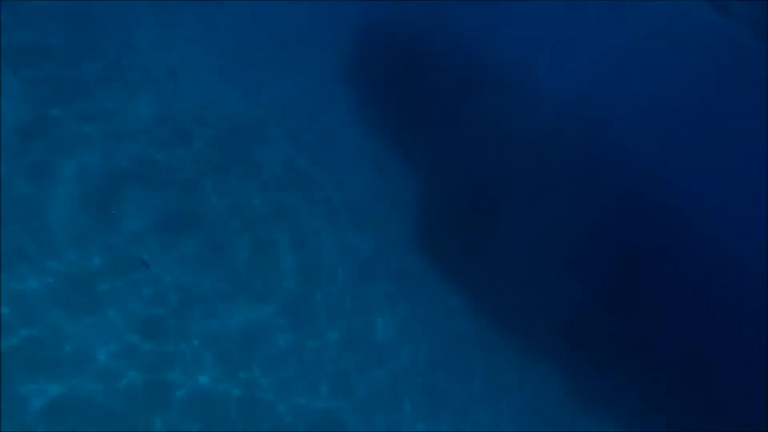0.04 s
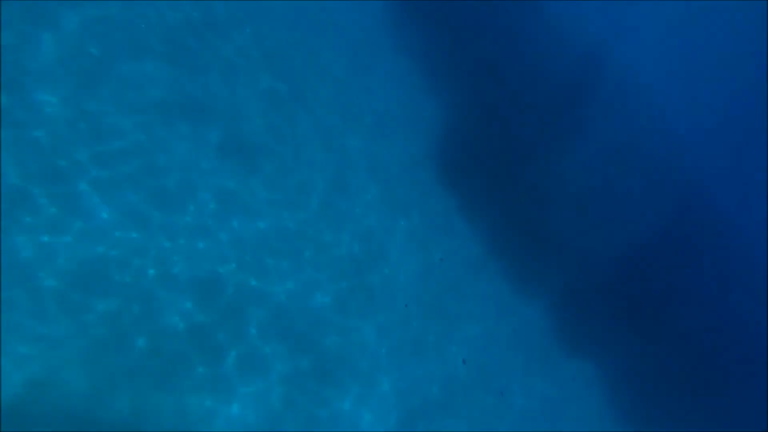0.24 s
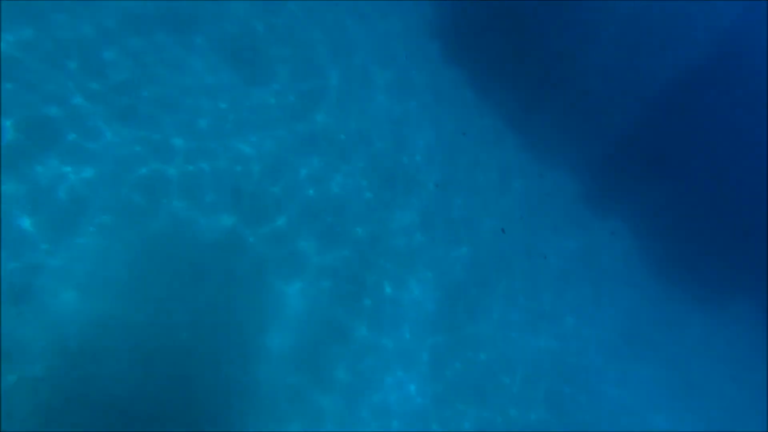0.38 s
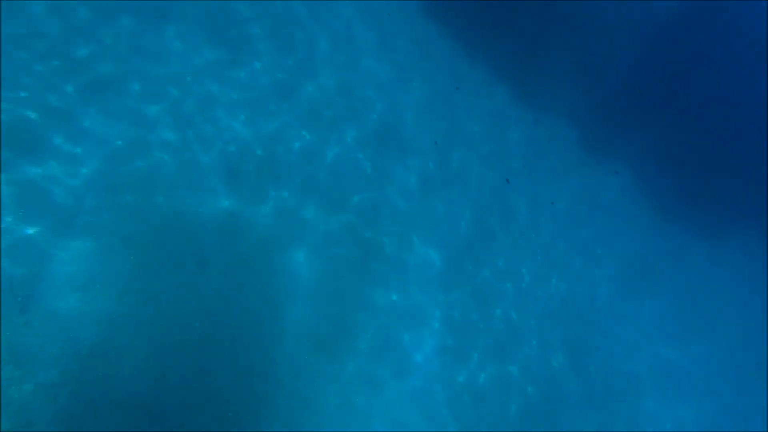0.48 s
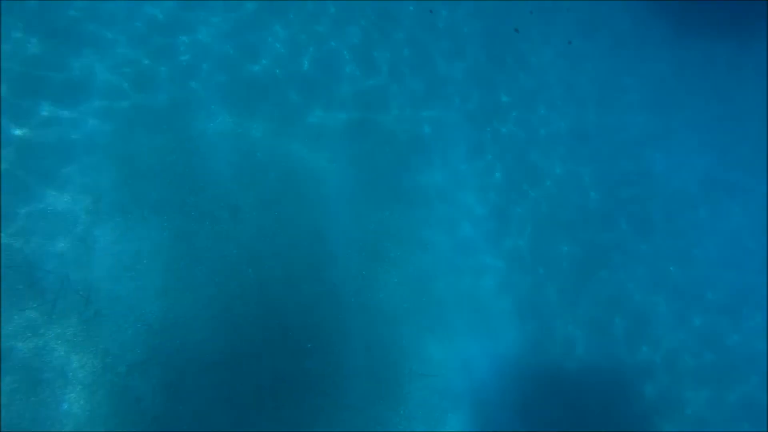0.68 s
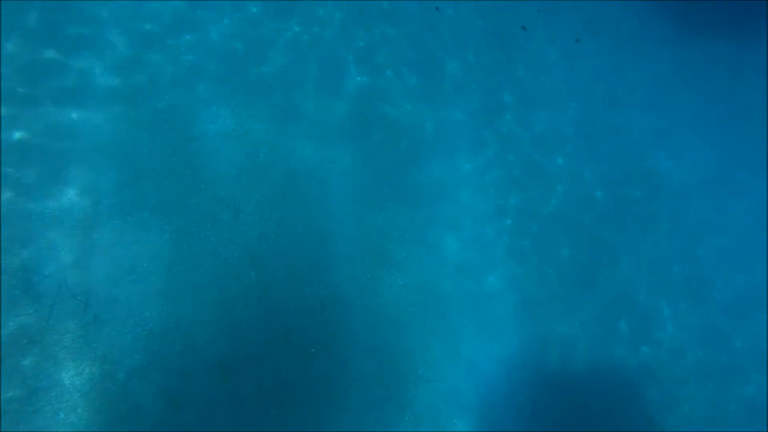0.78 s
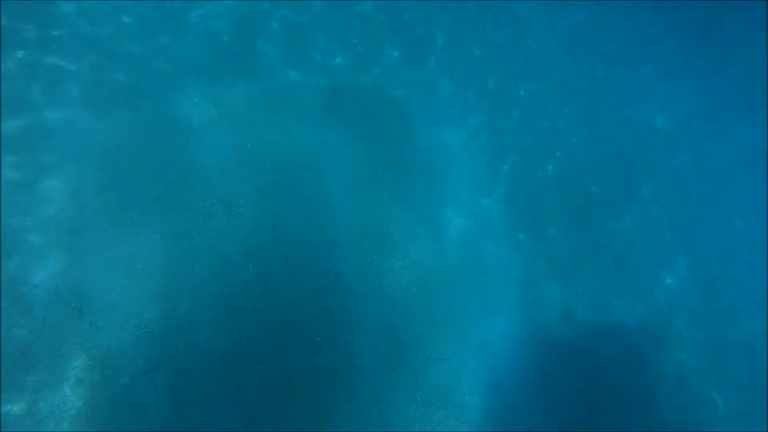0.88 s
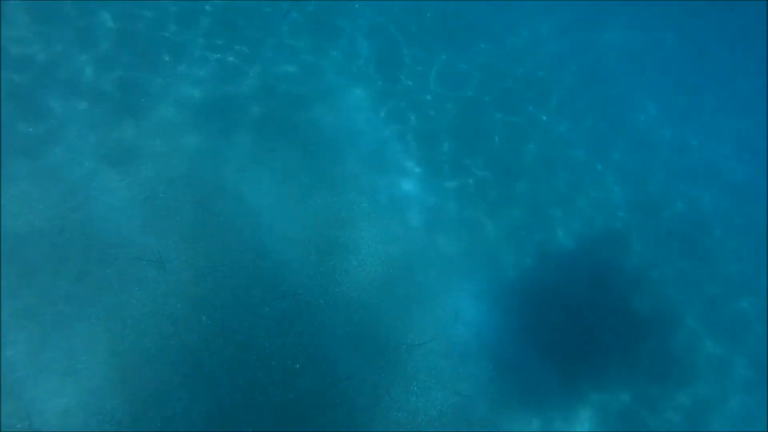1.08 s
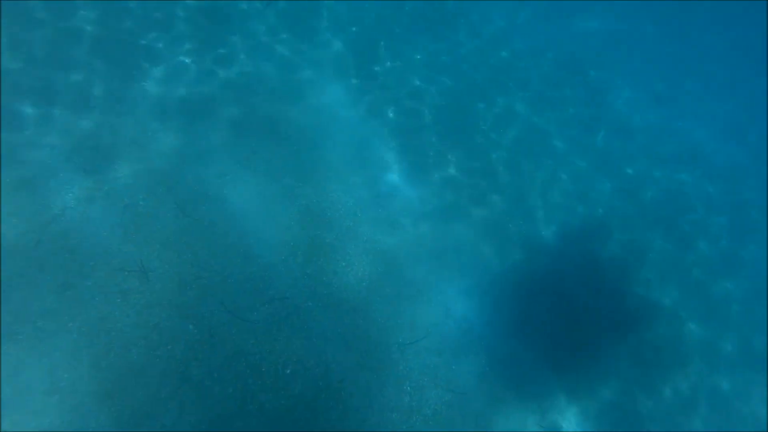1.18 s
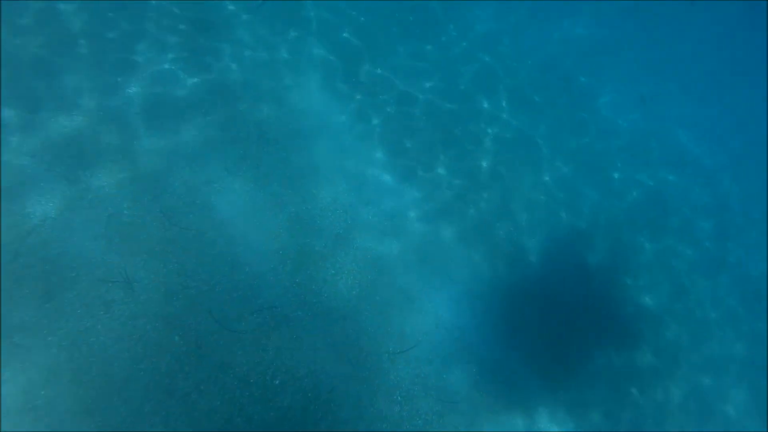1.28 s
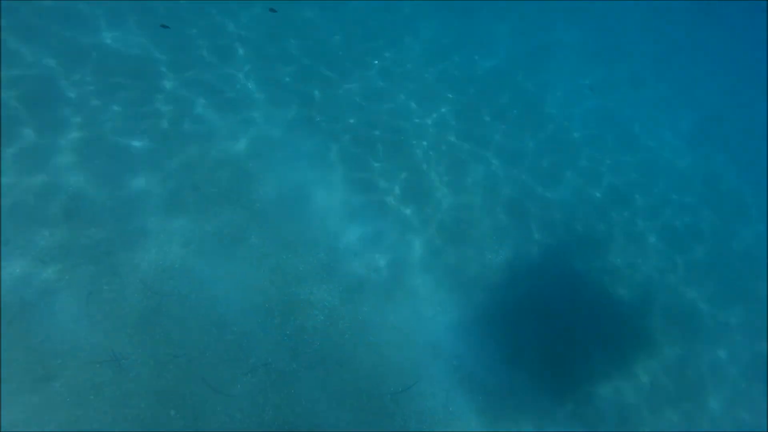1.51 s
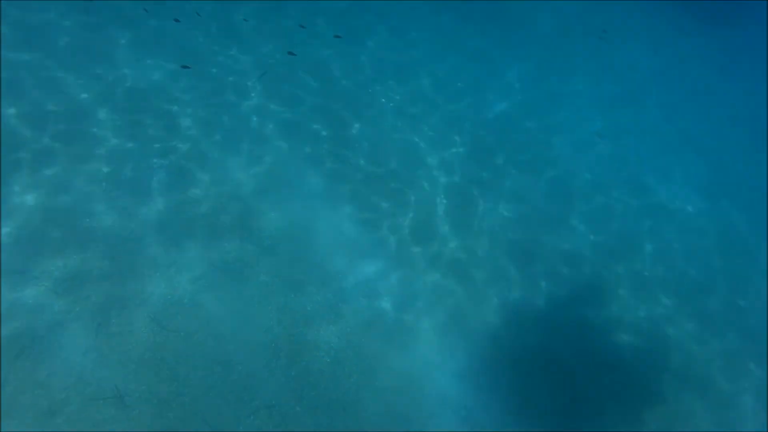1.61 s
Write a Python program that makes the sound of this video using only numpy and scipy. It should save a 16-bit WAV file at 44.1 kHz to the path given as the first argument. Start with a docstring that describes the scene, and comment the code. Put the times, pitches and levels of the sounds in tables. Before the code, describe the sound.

A splash hits a waterproof camera dipped into the sea: water slaps the case, spray hisses and pops, and surges close over the microphones. Underwater, muffled gurgles and glugs thin out to a dull hum.

```python
"""A camera in a waterproof housing is dipped into the sea, its two microphones right at the waterline.
Water slaps the case and rocks it, then spray hisses and pops over churning water. Two heavy surges close
over the microphone ports, which seal with thin snaps. Below the surface a shrinking air pocket gurgles
upward in pitch and sinks back, bubbles glug and tick ever more thinly, and the housing's muffled drone
is left."""
import sys
import numpy as np
from scipy import signal
from scipy.fft import rfft, irfft, next_fast_len
from scipy.io import wavfile
from scipy.ndimage import map_coordinates

SR = 44100
rng = np.random.default_rng(int(sys.argv[2]) if len(sys.argv) > 2 else 0)


def wav_record(signal):
    """Record a signal, one row per channel, as 16-bit PCM in the file named by sys.argv[1]."""
    frames = np.transpose(np.atleast_2d(signal))
    bounded = np.clip(frames, -1, 1)
    # unit amplitude maps onto the largest positive 16-bit level
    quanta = np.round(bounded * 32767).astype(np.int16)
    wavfile.write(sys.argv[1], SR, quanta)


N = 72765
UNDER_S = 0.44  # the microphone ports go under
BUBBLE_SWELL, BUBBLE_RISE = 0.064, 0.031  # attack as a share of ring time; pitch rise over that time


def amp(db):
    return 10 ** (np.asarray(db) / 20)


def unit_rms(x):
    return x / np.sqrt(np.mean(x ** 2) + 1e-20)


def clock():
    return np.arange(N) / SR


def curves(rows):
    """One value per sample for each column after the time."""
    times, *columns = np.transpose(rows)
    return [np.interp(clock(), times, column) for column in columns]


def wobble(rate):
    """A smooth random curve, rate knots a second."""
    return map_coordinates(rng.standard_normal(2048), [clock() * rate + 4], mode="wrap")


def decay(start, t60, attack):
    """An envelope that swells, then falls 60 dB in t60 seconds."""
    age = np.maximum(clock() - start, 0)
    return (1 - np.exp(-age / attack)) * amp(-60 * age / t60)


def filtered(x, response):
    size = next_fast_len(N + SR // 2)
    return irfft(rfft(x, size) * response(np.fft.rfftfreq(size, 1 / SR)), size)[..., :N]


def coloured(x, colour):
    knots_hz, db = np.transpose(colour)
    return filtered(x, lambda hz: amp(np.interp(np.log(hz + 1), np.log(knots_hz), db)))


def lowpass(x, edge_hz, order):
    return filtered(x, lambda hz: 1 / np.sqrt(1 + (hz / edge_hz) ** (2 * order)))


def patter(colour, rate, spread_db, smooth):
    """Two unrelated streams of tiny impacts over smooth noise, rms 1."""
    hits = (rng.random((2, N)) < rate / SR) * rng.choice([-1, 1], (2, N))
    strength = amp(spread_db * np.minimum(rng.exponential(size=(2, N)), 3))
    return unit_rms(coloured(unit_rms(hits * strength) + smooth * rng.standard_normal((2, N)), colour))


def bursts(rows, colour, t60):
    """Two unrelated streams of very short noisy cracks."""
    envelope = sum(amp(db) * decay(start, t60, attack=0.00017) for start, db in rows)
    noise = rng.standard_normal((2, N))
    return coloured(noise * envelope, colour) / coloured(noise, colour).std()


def bubble(start, hz, t60):
    """A damped ring whose pitch climbs as the bubble rises."""
    age = np.maximum(clock() - start, 0)
    climb = 1 + BUBBLE_RISE * np.minimum(age / t60, 2) / 2
    return decay(start, t60, BUBBLE_SWELL * t60) * np.sin(2 * np.pi * hz * age * climb)


def pings(low_hz, high_hz, cycles, spread_db, count):
    """A swarm of tiny bubbles, each a brief rising ping; rms 1."""
    when, pitch, strength = rng.random((count, 3)).T[:, :, None]
    offsets = np.arange(SR // 40)
    hz = low_hz * (high_hz / low_hz) ** pitch
    turns = hz * offsets / SR
    envelope = amp(spread_db * strength ** 3 - 60 * turns / cycles) * (1 - np.exp(-0.8 * turns))
    rings = envelope * np.sin(2 * np.pi * turns * (1 + BUBBLE_RISE * turns / cycles / 2))
    positions = (when * N).astype(int) + offsets
    return unit_rms(np.bincount(positions.ravel(), rings.ravel(), N)[:N])


def in_air():
    """1 while the ports are in air, 0 once they are under."""
    return 1 / (1 + np.exp((clock() - UNDER_S) / 0.0051))


def stereo(pair, width, left_db=0):
    """Left and right microphones from a common and a differing stream."""
    common, side = pair[0], width * pair[1]
    return np.array([(common + side) * amp(left_db / 2), (common - side) * amp(-left_db / 2)])


# How differently the two ports hear the water. Each row: time in seconds, ratio of differing to common.
PORT_WIDTH = [(.1, 3.3), (.2, 1.42), (.42, 0.8), (.55, 0.37), (.9, 0.27), (1.2, 0.02)]
def port_width():
    """The image is wide at the surface and narrows almost to mono below it."""
    return curves(PORT_WIDTH)[0]


# Water striking the case. Each row: start in seconds, crack and rocking levels in relative dB,
# rocking frequency in Hz, rocking ring time in seconds.
CASE_SLAPS = [(0.0, -30.5, -6, 165.2, 0.12), (.071, -14, 5, 110, 0.063)]
# The case's resonances. Each row: centre in Hz, bandwidth in Hz, gain in dB.
CASE_MODES = [(335, 220, 3.5), (640, 610, 0), (2300, 330, -0.5), (2890, 110, 6), (5520, 640, -13.5)]
# The case's damping. Each row: frequency in Hz, gain in dB.
CASE_TREBLE_LOSS = [(4000, -1.5), (12000, -13)]
def slaps():
    """Each slap cracks through the case around the microphones and rocks it from side to side."""
    def case(hz):
        return sum((-1) ** k * amp(db) * 1j * hz * band / (centre ** 2 - hz ** 2 + 1j * hz * band)
                   for k, (centre, band, db) in enumerate(CASE_MODES))
    noise = rng.standard_normal((2, N))
    impacts = sum(amp(db) * decay(start, t60=0.023, attack=0.001) for start, db, *_ in CASE_SLAPS)
    crack = filtered(noise * impacts, case) / filtered(noise, case).std()
    rock = sum(amp(db) * decay(start, t60, attack=0.0099) * np.sin(2 * np.pi * hz * (clock() - start))
               for start, _, db, hz, t60 in CASE_SLAPS)
    rocking = np.array([rock, -0.62 * rock])  # the right port is pushed the opposite way
    return stereo(coloured(crack, CASE_TREBLE_LOSS), width=1.5, left_db=1.0) + rocking


# Spray landing on the case. Each row: time in seconds, relative level in dB.
SPRAY_LEVELS = [(0.0, -42), (.035, -55.5), (.075, -53.5), (.098, -38.5), (.138, -47.5), (.16, -46.5),
                (.235, -36.5), (.355, -36.5), (.39, -42.5), (.425, -41.5), (.46, -55), (.485, -51),
                (.52, -51), (.553, -56.5), (.58, -64.5)]
# The droplets' tone. Each row: frequency in Hz, gain in dB.
DROPLET_COLOUR = [(1200, 8.5), (3000, 7), (4200, 2.5), (7000, 4), (9000, -8.5), (12000, -20.5),
                  (15500, -43.5)]
def spray():
    """Droplets and bursting foam hiss right at the ports; the water muffles them as it closes over."""
    level_db, = curves(SPRAY_LEVELS)
    fade_db = -130 * np.maximum(clock() - SPRAY_LEVELS[-1][0], 0)
    drops = patter(DROPLET_COLOUR, rate=1900, spread_db=4.5, smooth=1.0)
    foam = amp(-5) * pings(low_hz=1100, high_hz=8000, cycles=18, spread_db=9, count=1200)
    envelope = amp(level_db + fade_db + 0.5 + 3.0 * wobble(120))
    hiss = envelope * (stereo(drops, 0.45 * port_width()) + foam)
    return in_air() * hiss + (1 - in_air()) * lowpass(hiss, edge_hz=7050, order=12)


# Water churning around the housing. Each row: time in seconds, relative level in dB.
CHURN_LEVELS = [(0.0, -21.5), (.045, -86), (.075, -34.5), (.14, -50.5), (.2, -42), (.27, -31), (.32, -34.5),
                (.425, -35.5), (.46, -49), (.5, -35.5), (.64, -33), (.74, -38), (.78, -40.5), (.85, -39),
                (.91, -50.5), (1.02, -48.5), (1.2, -56), (1.3, -65)]
# Its dull tone. Each row: frequency in Hz, gain in dB.
CHURN_COLOUR = [(25, -14), (70, 6), (220, 3), (650, -0.5), (1100, -8), (1800, -22), (3800, -28),
                (9000, -77)]
def churn():
    """Close by, water churns in a dense patter of dull collapses, with a cloud of small bubbles."""
    level_db, = curves(CHURN_LEVELS)
    fade_db = -60 * np.maximum(clock() - CHURN_LEVELS[-1][0], 0)
    collapses = patter(CHURN_COLOUR, rate=700, spread_db=0.5, smooth=0.46)
    envelope = amp(level_db + fade_db + 1.5 + 1.8 * wobble(70))
    cloud = amp(level_db - 16) * pings(low_hz=676, high_hz=1586, cycles=33, spread_db=12, count=170)
    return envelope * stereo(collapses, port_width(), left_db=1.5) + cloud


# Pops at the case. Each row: start in seconds, relative level in dB.
CASE_POPS = [(.107, -27), (.275, -14), (.375, -19.5), (.412, -18), (.431, -24.5), (.478, -36.5),
             (.548, -25.5), (.56, -22)]
# Their tone. Each row: frequency in Hz, gain in dB.
CASE_POP_COLOUR = [(200, 3), (1500, 6), (3000, -1), (6500, -19.5), (9000, -33.5), (15000, -46)]
def pops():
    """Sharp pops sound against the case as it passes through the surface."""
    return stereo(amp(-6.5) * bursts(CASE_POPS, CASE_POP_COLOUR, t60=0.026), width=0.37)


# Surges closing over the ports. Each row: centre and half length in seconds, pitch in Hz, relative dB.
PORT_SURGES = [(.226, 0.0032, 166, -16.5), (0.278, 0.019, 57.7, -15), (0.389, 0.039, 62, -16.5),
               (0.423, 0.018, 64, -11.5)]
# Their turbulence. Each row: frequency in Hz, gain in dB.
TURBULENCE_COLOUR = [(45, -3.5), (130, -4.5), (300, -14), (900, -35.5), (3000, -40), (12000, -69.5)]
def surges():
    """Swells of pressure throb over rough lapping, louder on the left microphone until it is under."""
    t = clock()
    swells = [amp(db) * np.exp(-np.abs((t - centre) / half) ** 3) for centre, half, _, db in PORT_SURGES]
    throb = sum(swell * np.sin(2 * np.pi * hz * (t - centre))
                for swell, (centre, _, hz, _) in zip(swells, PORT_SURGES))
    lapping = amp(-36.5) * in_air() * np.minimum(t / 0.062, 1) ** 2
    turbulence = patter(TURBULENCE_COLOUR, rate=320, spread_db=5.0, smooth=0.93)
    pressure = (amp(-8) * sum(swells) + lapping) * turbulence
    pressure[0] += throb  # common to both ports
    return stereo(pressure, width=0.28, left_db=4.5 * np.clip((UNDER_S - t) / 0.08, 0, 1))


# Water sealing the ports. Each row: start in seconds, relative level in dB.
SEAL_SNAPS = [(.4055, -34), (.411, -29.5), (.4162, -23.5), (.4215, -25), (.4322, -30), (.4377, -34.5)]
# The snaps' tone. Each row: frequency in Hz, gain in dB.
SEAL_COLOUR = [(1500, -2), (8000, 1), (15800, -7)]
def snaps():
    """Water seals the ports with thin, bright snaps, a little to the right."""
    return stereo(amp(0.5) * bursts(SEAL_SNAPS, SEAL_COLOUR, t60=0.0027), width=0.44, left_db=-3.0)


# Large bubbles near the ports. Each row: start in seconds, relative dB, pitch in Hz, ring time in seconds.
LARGE_BUBBLES = [(.407, -23, 1460, 0.014), (.517, -19.5, 506, 0.046), (.547, -23.5, 1245, 0.025),
                 (.559, -18, 641, 0.019), (.617, -18.5, 179, 0.029), (.643, -17.5, 280.4, 0.051),
                 (.706, -40.5, 1562, 0.061), (.743, -18.5, 684, 0.02), (.82, -19.5, 744, 0.022),
                 (.827, -25, 473.6, 0.14), (0.872, -23.5, 552, 0.11), (.935, -24.5, 656, 0.061),
                 (.943, -19.5, 319, 0.047), (1.023, -27, 712, 0.052), (1.081, -27.5, 395, 0.098),
                 (1.109, -38.5, 1310, 0.023), (1.138, -28, 161, 0.089), (1.203, -21, 170, 0.03),
                 (1.35, -35, 299.5, 0.13), (1.505, -32.5, 303.5, 0.16)]
def glugs():
    """Each large bubble rings as it tears off in a puff of turbulence around its own pitch."""
    mix = np.zeros((2, N))
    for start, db, hz, t60 in LARGE_BUBBLES:
        band = signal.butter(2, [hz / 1.5, hz * 1.5], "bandpass", fs=SR, output="sos")
        noise = unit_rms(signal.sosfilt(band, signal.sosfilt(band, rng.standard_normal((2, N)))))
        puff = amp(-2.5) * stereo(noise, port_width()) * decay(start, t60, BUBBLE_SWELL * t60)
        mix += amp(db) * (bubble(start, hz, t60) + puff)
    return mix


# Air trapped just under the surface. Each row: time in seconds, pitch in Hz, level in dB.
TRAPPED_AIR = [(.5, 72, -33.5), (.6, 86.04, -31.5), (.65, 97.85, -23), (.69, 109.2, -31.5),
               (.73, 134.2, -24.5), (.8, 157.9, -28), (.87, 158.2, -32.5), (.97, 140.9, -42.5),
               (1.04, 112.1, -44), (1.13, 100.1, -43), (1.26, 93.6, -37.5), (1.38, 113.3, -57.5)]
def air_pocket():
    """The trapped air throbs unevenly, rising in pitch as it breaks up, then sinking as it fades."""
    hz, level_db = curves(TRAPPED_AIR)
    phase = 2 * np.pi * np.cumsum(hz * np.exp(0.22 * wobble(200))) / SR
    throb = unit_rms(amp(3 * wobble(110)) * (np.sin(phase) + 0.3 * np.sin(2 * phase + wobble(90))))
    onset = np.clip((clock() - UNDER_S) / 0.0083, 0, 1)
    return amp(level_db) * onset * throb


# Fizz around the submerged case. Each row: time in seconds, level in dB.
FIZZ_LEVELS = [(.44, -76), (.55, -37.5), (.62, -54), (.8, -66.5), (1.05, -65.5), (1.3, -76.5), (1.65, -82)]
# The tone of tiny bubbles at the case, fizz and ticks alike. Each row: frequency in Hz, gain in dB.
TINY_BUBBLE_COLOUR = [(1300, 1.5), (2000, -10.5), (4000, -7), (4600, -29), (5800, -19.5), (7500, -38.5),
                      (12000, -73.5)]
def fizz():
    """A swarm of tiny bubbles flares just after the ports go under, then thins away."""
    level_db, = curves(FIZZ_LEVELS)
    swarm = np.array([pings(low_hz=1300, high_hz=4500, cycles=10, spread_db=14, count=600)
                      for _ in range(2)])
    return stereo(amp(level_db) * unit_rms(coloured(swarm, TINY_BUBBLE_COLOUR)), port_width())


# Bubbles ticking on the submerged case. Each row: start in seconds, relative level in dB.
CASE_TICKS = [(0.718, -45.5), (0.855, -46), (0.939, -39), (.993, -37), (1.02, -42.5), (1.176, -47),
              (1.207, -40.5), (1.225, -54.5)]
def ticks(count=9, span_s=0.016):
    """Each tick is a cluster of tiny bubbles bursting one after another, each at its own pitch."""
    mix = np.zeros(N)
    for start, db in CASE_TICKS:
        delays = np.sort(rng.random(count)) * span_s
        pitches = rng.permutation(np.linspace(1700, 4000, count)) * rng.uniform(0.92, 1.08, count)
        for delay, hz in zip(delays - delays[0], pitches):
            mix += amp(db + 7) * bubble(start + delay, hz, t60=0.004)
    return coloured(mix, TINY_BUBBLE_COLOUR)


# The housing's hum, heard from inside. Each row: frequency in Hz, gain in dB.
HOUSING_COLOUR = [(25, -14.5), (110, -10.5), (190, -4), (270, -0.5), (440, -19.5), (620, -16), (800, -27),
                  (1500, -52), (4000, -57), (9000, -85.5)]
def housing_drone(hollow_hz=314.2):
    """Water flowing past makes the housing hum dully and burble on its hollow note, alike at both ports."""
    hum = amp(-44.5 + wobble(14)) * unit_rms(coloured(rng.standard_normal(N), HOUSING_COLOUR))
    phase = 2 * np.pi * np.cumsum(hollow_hz * (1 + 0.07 * wobble(60))) / SR
    hollow = amp(-45.5) * unit_rms(amp(3.5 * wobble(50)) * np.sin(phase))
    emerging = np.clip((clock() - UNDER_S) / 0.92, 0, 1) ** 2  # the note emerges as the foam clears
    return hum + emerging * hollow


def scene():
    """The dip, heard from the housing: first the surface, then the water below."""
    surface = slaps() + spray() + churn() + pops() + surges() + snaps()
    return surface + glugs() + air_pocket() + fizz() + ticks() + housing_drone()


def record(dry):
    """The camera keeps nothing above its band limit."""
    return lowpass(dry, edge_hz=15800, order=60)


dry = scene()
out = record(dry)
wav_record(out)
```